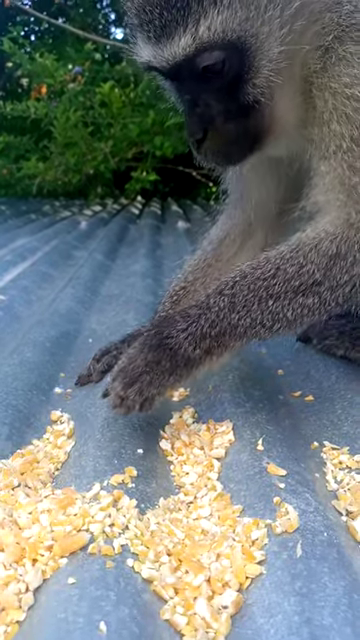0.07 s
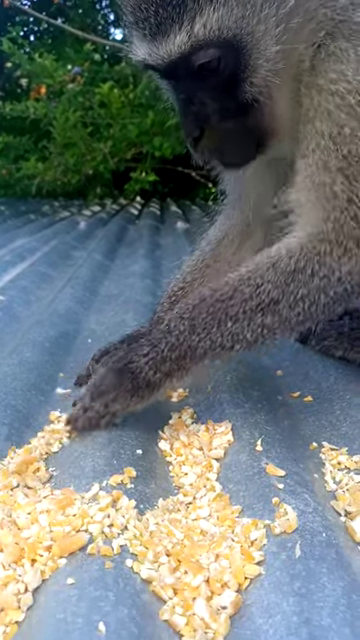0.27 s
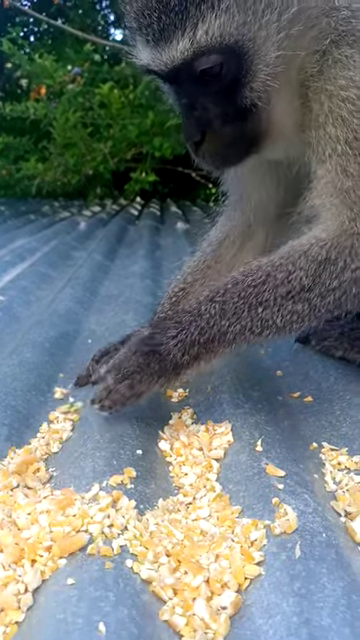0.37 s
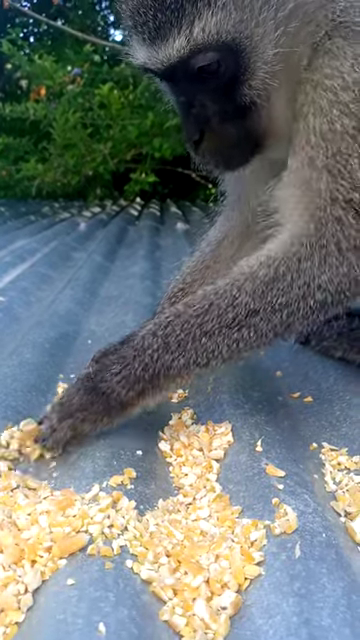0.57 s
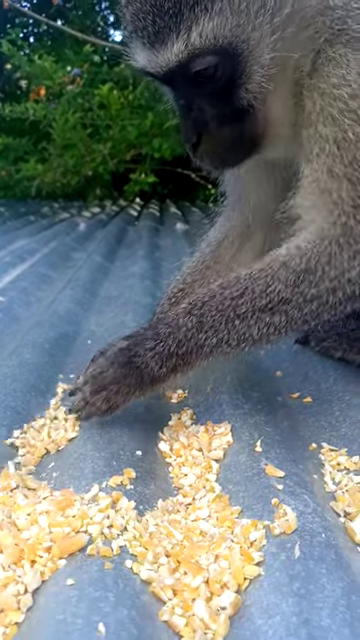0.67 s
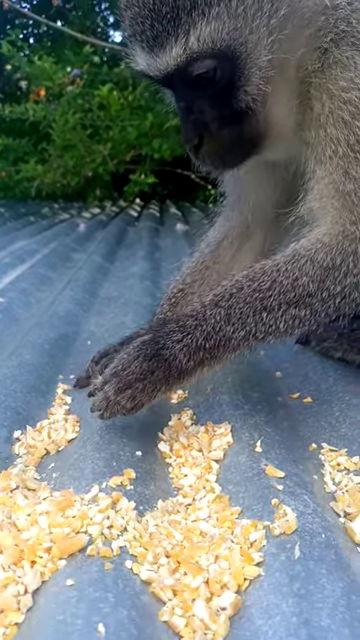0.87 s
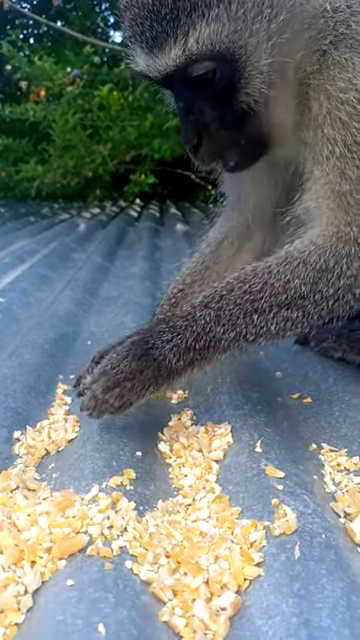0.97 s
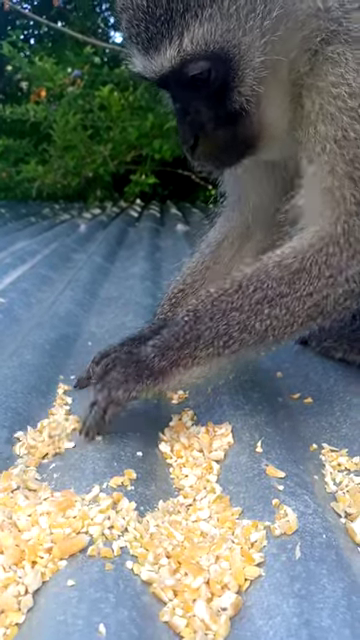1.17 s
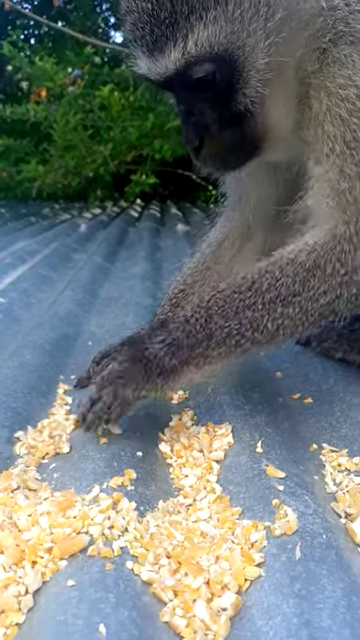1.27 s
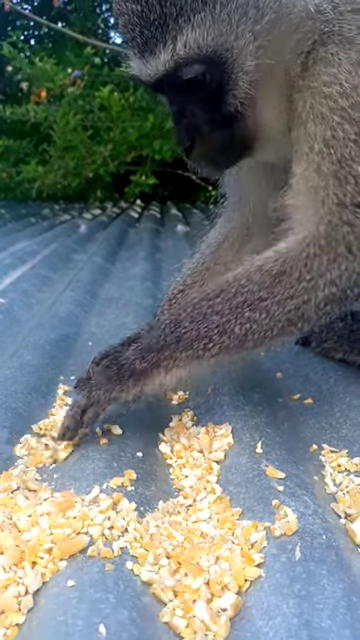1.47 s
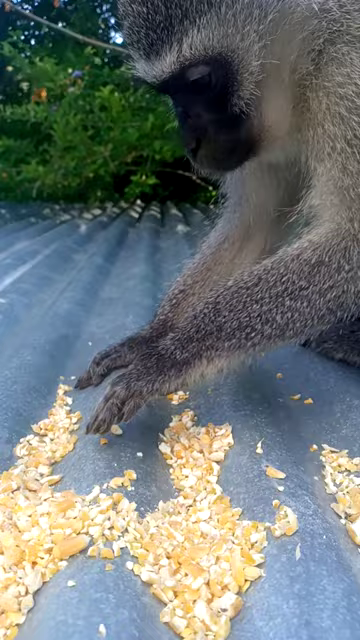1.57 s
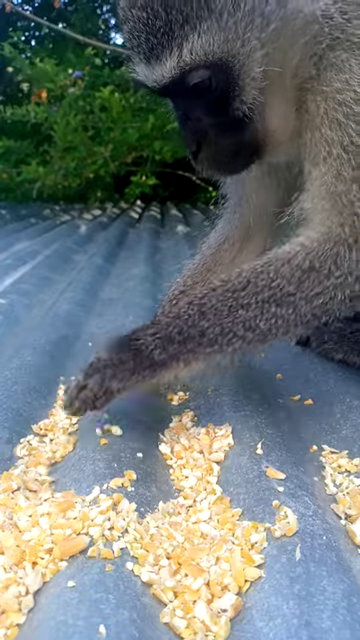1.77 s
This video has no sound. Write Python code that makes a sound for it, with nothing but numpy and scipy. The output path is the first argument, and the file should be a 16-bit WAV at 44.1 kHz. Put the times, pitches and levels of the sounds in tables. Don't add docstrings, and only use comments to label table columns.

```python
import sys
import numpy as np
from scipy import signal
from scipy.fft import rfft, irfft, next_fast_len
from scipy.io import wavfile
from scipy.ndimage import uniform_filter1d, map_coordinates

SR = 44100
rng = np.random.default_rng(int(sys.argv[2]) if len(sys.argv) > 2 else 0)


def transcribe(signal):
    frames = np.atleast_2d(signal).T
    limited = np.clip(frames, -1, 1)
    pcm = np.round(limited * 32767).astype(np.int16)
    wavfile.write(sys.argv[1], SR, pcm)


def elevation(decibels):
    levels = np.asarray(decibels, float)
    return 10 ** (levels / 20)


N = 81585


def unit(x):
    return x / np.sqrt(np.mean(x ** 2) + 1e-20)


def curves(rows):
    times, *columns = np.transpose(rows)
    return [np.interp(np.arange(N) / SR, times, column) for column in columns]


def wobble(rate):
    knots = rng.standard_normal(int(N * rate / SR) + 4)
    return map_coordinates(knots, [np.arange(N) * rate / SR])


def coloured(x, points):
    size = next_fast_len(N + 8192)
    hz, db = np.transpose(points)
    log_hz = np.log(np.r_[hz[0] * .8, hz, hz[-1] * 1.06])
    gain_db = np.interp(np.log(np.fft.rfftfreq(size, 1 / SR) + 1), log_hz, np.r_[-100, db, -100])
    cepstrum = irfft(gain_db * np.log(10) / 20, size)
    cepstrum[1:size // 2] *= 2
    cepstrum[size // 2 + 1:] = 0
    return irfft(rfft(x, size) * np.exp(rfft(cepstrum)), size)[:N]


# (frequency [Hz], level [dB])
BODY = [(180, -14.5), (330, -15.5), (650, -19), (1250, -7), (2100, -6.5), (2750, -2.5), (3400, -6.5),
        (6000, -11.5)]
# (frequency [Hz],
# level [dB])
SHELL = [(2500, -70), (4200, -6.5), (5200, -9.5), (6300, -0.5), (7300, -0.5), (8200, -11.5), (9500, -29)]
# (frequency [Hz], level [dB])
EDGE = [(6500, -60), (8500, -14.5), (11000, -15), (13800, -17), (14800, -2), (15600, -2), (15950, -40),
        (16800, -75)]


def kernel(body, shell, edge):
    return coloured(body, BODY) + coloured(shell, SHELL) + coloured(edge, EDGE)


def rattle():
    grains_per_s, size_spread_db, grain_t60_s = 1700, 3.2, .008
    hits = rng.random(N) < grains_per_s / SR
    sizes = elevation(2 * size_spread_db * np.clip(rng.standard_normal(N), -3, 1.8))
    power = signal.lfilter([1], [1, -elevation(-120 / (grain_t60_s * SR))], hits * sizes)
    return unit(np.sqrt(power) * rng.standard_normal(N))


def patchy(x):
    patch_db = 1.8
    spectrum = signal.stft(x, nperseg=256)[2]
    field = uniform_filter1d(rng.standard_normal(spectrum.shape), size=5, axis=0)
    field = uniform_filter1d(field, size=8, axis=1)
    return signal.istft(spectrum * elevation(patch_db * unit(field)), nperseg=256)[1][:N]


# (time [s], drag level [dB], edge brightness [dB])
STROKES = [
    [(0, -48.5, 1), (.05, -58, -11), (.12, -65.5, -22), (.21, -77, 1)],
    [(.218, -43, -8), (.224, -38.5, -4), (.27, -39.5, -1.5), (.32, -46.5, -3), (.45, -46.5, -2),
     (.53, -59.5, 0)],
    [(.542, -33.5, 0), (.6, -39, 1), (.645, -38.5, -4), (.655, -44, -6.5), (.74, -44.5, -5),
     (.8, -54.5, -11), (.86, -70, -27)],
    [(.86, -63.5, -16), (1.0, -77.5, -2), (1.08, -68, -2)],
    [(1.088, -45.5, 11), (1.13, -40, -7.5), (1.17, -39.5, -3), (1.22, -49.5, -4), (1.39, -58, -11)],
    [(1.397, -44.5, 6), (1.47, -36.5, 0.5), (1.51, -44, -7), (1.59, -41, -6.5), (1.65, -61, -1),
     (1.69, -66, -29)],
    [(1.69, -58.5, -2), (1.77, -83, 0), (1.81, -63, -22)],
]
STROKE_BODY_DB = [-2.5, 0, 2.5, 4.5, 3.5, 3.5, -4.5]


def raking():
    drag_db = 0
    t, drive = np.arange(N) / SR, np.zeros((3, N))
    for rows, body_db in zip(STROKES, STROKE_BODY_DB):
        level_db, bright_db = curves(rows)
        stroke = elevation([level_db + body_db, level_db, level_db + bright_db])
        drive = np.where(t >= rows[0][0], stroke, drive)
    shared = rattle()
    parts = np.array([(shared + .5 * rattle()) * elevation(wobble(39.7)) for _ in range(3)])
    steady_level = np.std(kernel(*parts))
    return elevation(drag_db) / steady_level * patchy(kernel(*(parts * drive)))


KNOCK_RISE_S = .0002
# (time [s], peak level [dB], body level [dB], edge level [dB])
KNOCKS = [(0.0094, -56, 2, 2), (0.021, -34, -8, -2), (0.0663, -32, -9, 0.5), (0.082, -36, -16, -5),
          (0.0928, -31.5, -28, -11), (0.2237, -12.5, -8.5, -4), (0.2453, -23.5, -11, 8),
          (0.3089, -24, -6, 4), (0.3118, -25, -8, 9), (0.3338, -31, -3, 9), (0.3562, -24.5, -10, 6),
          (0.387, -21, -1, 1), (0.4258, -22.5, -6.5, 6), (0.481, -37, -10, 9), (0.5083, -29, -17, 7),
          (0.5444, -15.5, -1, -16), (0.58, -17, -22, -11), (0.5939, -15.5, -3, -4),
          (0.621, -11, -2, -3), (0.637, -14.5, -8, -2), (0.6641, -18.5, -7, 8.5),
          (0.6733, -20, 6.5, 7.5), (0.7061, -21.5, -1, 1.5), (0.725, -30.5, -2, 9),
          (0.7676, -19, -10, 1.5), (0.811, -32.5, 3.5, -16),
          (0.9265, -40, -18, 1), (0.9467, -46.5, 8, 8.5), (1.0669, -36, -22, -17),
               (1.0907, -21, -24, -5), (1.109, -29, -22, 10), (1.1444, -25, -12, 1), (1.1584, -32, -11, 6),
               (1.1767, -19.5, -0.5, -7), (1.238, -29, -7, 2), (1.213, -36, -5, 5), (1.2647, -24.5, -8, -1),
               (1.293, -39, 1, 9), (1.3159, -31, 7, 0), (1.3987, -14, 0, -9), (1.4083, -12, -3.5, -5),
               (1.4926, -25, 7, -10), (1.5523, -21, 2, -1.5), (1.5649, -17, 4.5, 0), (1.679, -47, 8.5, 8),
               (1.7168, -40, -14, -3), (1.736, -44, -11, -1), (1.8005, -33, -19, -13),
               (1.8268, -38, -23, -17), (1.8464, -37, -14, -19),
          (0.2344, -22.5, -8, 7), (0.2531, -20, -3.5, 4), (0.3707, -26, -7, 4),
                (0.3922, -30.5, 0, 10), (0.446, -32.5, -6, 8), (0.4597, -40, -4, 3), (0.5652, -14, -15, -7),
                (0.5754, -20, -6, 1), (0.646, -29, -10, 3), (0.7808, -33.5, 5, 7), (0.8297, -47, -1, 4),
                (1.1303, -35, 3, 3), (1.3462, -42, 9, -1), (1.3607, -37, 5, -4), (1.4173, -22, -1, 2),
                (1.4623, -23, -4, -5), (1.4783, -31, -11, 3), (1.4996, -33, -6, 11), (1.5128, -30, -1, 3),
                (1.5224, -32, 4, 9), (1.531, -26, 5, 4), (1.5834, -29, -10, 1), (1.598, -39, -2, 11)]


def knocks():
    knock_db, fall_s = -4, .0015
    drive, t = np.zeros((3, N + 1024)), np.arange(1024) / SR
    shape = (1 - np.exp(-t / KNOCK_RISE_S)) * np.exp(-(t / fall_s) ** 0.93 / 2)
    shape = shape / shape.max()
    for s, db, body_db, edge_db in KNOCKS:
        burst = shape * np.clip(rng.standard_normal((3, len(t))), -1.7, 1.7)
        balance_db = np.array([[body_db], [0], [edge_db]])
        start = round(s * SR)
        drive[:, start:start + len(t)] += elevation(db + knock_db + balance_db) * burst
    return kernel(*drive[:, :N])


# (time [s], level [dB], frequency [Hz])
TICKS = [(0.226, -36.5, 1680), (0.5443, -30.5, 1740), (1.0909, -34.5, 1660), (1.133, -33, 2400),
         (1.568, -31, 2390), (1.3986, -32, 1810), (1.3994, -27, 2710), (1.4071, -22, 4440),
         (.8113, -39, 3910), (0.8118, -47, 7200), (.889, -48, 5300), (0.931, -50, 7400), (.948, -53, 7640),
         (.986, -66, 7340), (1.012, -60, 7500), (1.017, -63, 2900), (1.025, -58, 7100), (1.038, -54, 8200),
         (1.068, -52, 7540), (1.679, -43, 5730), (1.702, -52, 6300), (1.719, -50, 7000), (1.736, -48, 6900),
         (1.7945, -44.5, 6540), (1.801, -43, 6560), (1.809, -52, 6300), (1.818, -54, 6170),
         (1.828, -39, 5470), (1.829, -45.5, 3800), (1.847, -48, 6550)]


def ticks():
    cycles_to_60_db, partner_ratio, partner_db = 57, 1.26, -11.5
    out, t = np.zeros(N + 2048), np.arange(2048) / SR
    for s, db, hz in TICKS:
        ring = np.sin(2 * np.pi * hz * t)
        ring = ring + elevation(partner_db) * np.sin(2 * np.pi * hz * partner_ratio * t)
        envelope = elevation(db - 60 * t * hz / cycles_to_60_db) * (1 - np.exp(-t / KNOCK_RISE_S))
        out[round(s * SR):][:len(t)] += envelope * ring
    return out[:N]


# (time [s], level [dB])
THUDS = [
    (0.22, -45.5),
    (0.543, -38),
    (.73, -43),
    (1.092, -46),
    (1.403, -34.5),
]
# (frequency [Hz], level [dB], 60 dB decay time [s])
ROOF = [(310, -3, .08), (480, -1, .08), (640, -1, .07), (1000, -4, .06), (1650, -3, .05)]


def thuds():
    rise_s = 0.0086
    out, t = np.zeros(N + 8192), np.arange(8192) / SR
    for s, db in THUDS:
        ring = np.zeros(len(t))
        for hz, level_db, t60_s in ROOF:
            decay = elevation(level_db + 2 * rng.standard_normal() - 60 * t / t60_s)
            phase = 2 * np.pi * hz * rng.normal(1, 0.06) * t
            drift = 1.06 * np.cumsum(rng.normal(0, 0.066, len(t)))
            ring += decay * np.sin(phase + drift)
        out[round(s * SR):][:len(t)] += elevation(db) * (1 - np.exp(-t / rise_s)) * ring
    return out[:N]


def sheet(x):
    t60_s = .11
    t = np.arange(SR // 4) / SR
    tail = rng.standard_normal(len(t)) * elevation(-60 * t / t60_s)
    return signal.fftconvolve(x, tail / np.linalg.norm(tail))[:N]


# (time [s], frequency [Hz], level [dB])
WHISTLE = [(1.66, 4500, -84), (1.68, 4440, -72), (1.705, 4200, -71), (1.72, 3980, -63), (1.74, 3840, -62),
           (1.755, 3800, -73), (1.785, 3850, -75), (1.83, 3750, -76), (1.85, 3700, -88)]


def whistle():
    hz, db = curves(WHISTLE)
    sounding = np.arange(N) / SR > WHISTLE[0][0]
    level = elevation(db + 6 + 2 * wobble(160)) * sounding
    return level * np.sin(2 * np.pi * np.cumsum(hz + 35 * wobble(300)) / SR)


# (time [s], length [s], start frequency [Hz], end frequency [Hz], level [dB])
CHIRPS = [(.855, .11, 4400, 4250, -66), (.855, .11, 2950, 2700, -65), (.865, .1, 2200, 2550, -67),
          (.93, .1, 4650, 5100, -70), (.96, .12, 2800, 2900, -70), (.96, .11, 4300, 4300, -73),
          (1.78, .04, 2680, 2680, -73), (.81, .15, 3900, 3600, -71), (.97, .06, 2400, 2500, -69),
          (1.015, .075, 5900, 6500, -70), (1.03, .055, 7900, 7700, -69), (.98, .045, 955, 955, -59),
          (1.69, .1, 4450, 4350, -76), (1.833, .035, 5200, 7700, -59)]


def chirps():
    hoarse_hz, rise_s, fall_s = 330, 0.0046, 0.019
    out, t = np.zeros(N), np.arange(N) / SR
    for s, length, start_hz, end_hz, level_db in CHIRPS:
        shape = np.clip(np.minimum((t - s) / rise_s, (s + length - t) / fall_s), 0, 1)
        phase = 2 * np.pi * np.cumsum(np.interp(t, [s, s + length], [start_hz, end_hz])) / SR
        wide = hoarse_hz * np.sqrt(start_hz / 3000)
        voice = wobble(wide) * np.sin(phase) + wobble(wide) * np.cos(phase)
        out += elevation(level_db) * shape * unit(voice)
    return out


# (time [s], level [dB])
AMBIENCE = [(0, -62.5), (.18, -60.5), (.21, -71.5), (.5, -71), (.56, -59.5), (.75, -60), (.82, -62),
            (.97, -59), (1.06, -63.5), (1.35, -62.5), (1.43, -60), (1.65, -59), (1.85, -70.5)]
# (frequency [Hz], level [dB])
HUM = [(25, -51), (60, -5), (130, 4.5), (200, 2.5), (320, -7), (450, -24), (800, -11), (1200, -61)]
# (frequency [Hz], level [dB])
DRONE = [(700, -10), (860, 0.5), (930, 13), (1000, 11.5), (1090, 6.5), (1300, -10.5), (7000, -8),
         (9000, -78)]


def ambience():
    drone_db = -4
    level_db, = curves(AMBIENCE)
    hum = unit(coloured(rng.standard_normal(N), HUM)) * elevation(level_db + 2 * wobble(18))
    drone = unit(coloured(rng.standard_normal(N), DRONE))
    return hum + drone * elevation(level_db.mean() + drone_db + 0.96 * wobble(18.02))


def scene():
    sheet_db = -11
    corn = raking() + knocks() + ticks()
    roof = elevation(sheet_db) * sheet(corn) + thuds()
    background = whistle() + chirps() + ambience()
    return (corn + roof + background)[None]


def top_cut(x):
    return signal.sosfilt(signal.butter(12, 16950, fs=SR, output="sos"), x)


def record(dry):
    ceiling = .11
    mix = dry / (1 + np.abs(dry / ceiling) ** 4) ** (1 / 4)
    return top_cut(mix)


dry = scene()
out = record(dry)
transcribe(out)
```